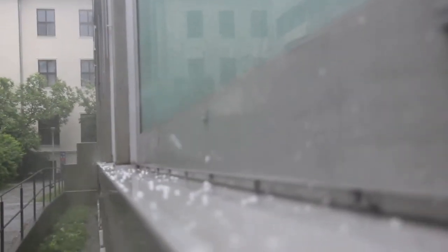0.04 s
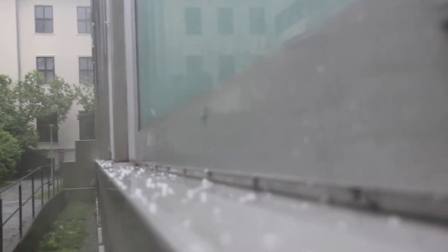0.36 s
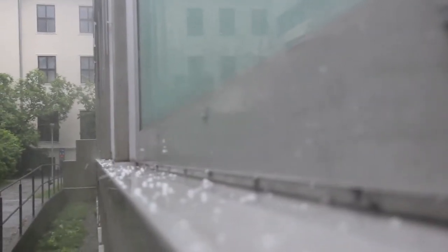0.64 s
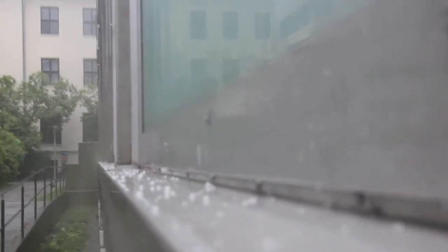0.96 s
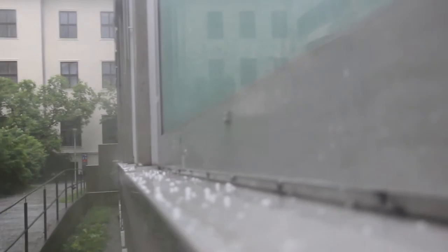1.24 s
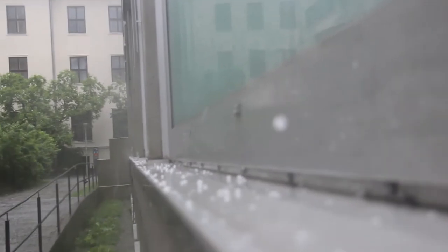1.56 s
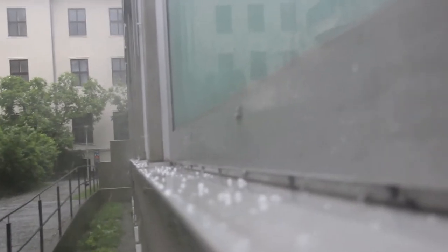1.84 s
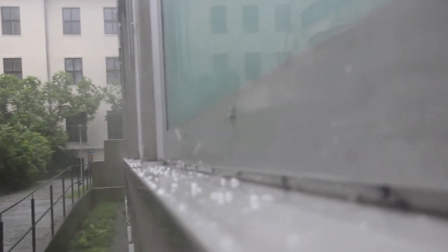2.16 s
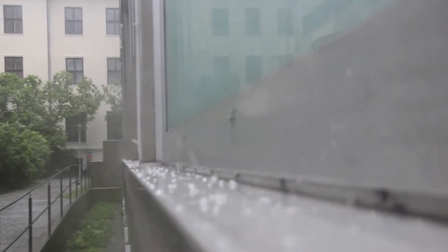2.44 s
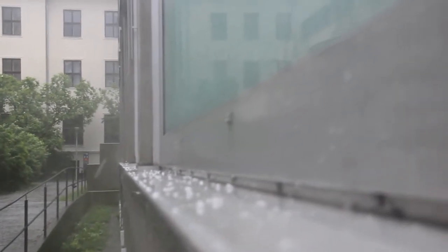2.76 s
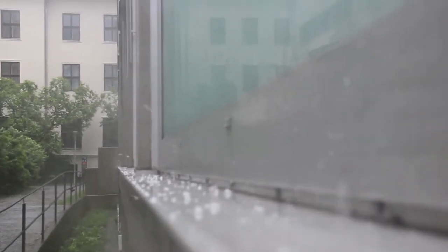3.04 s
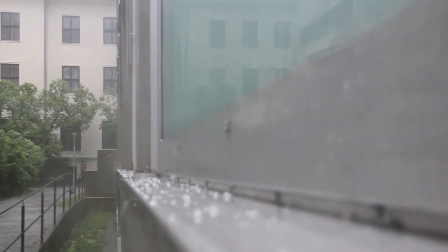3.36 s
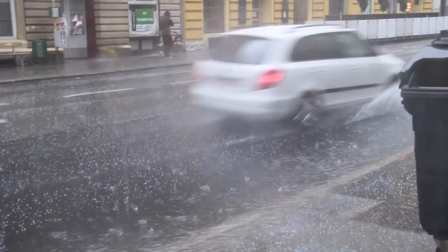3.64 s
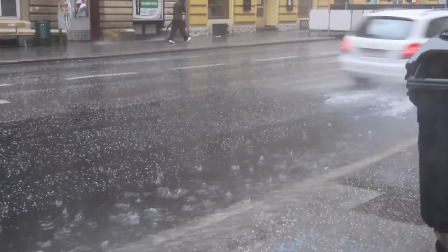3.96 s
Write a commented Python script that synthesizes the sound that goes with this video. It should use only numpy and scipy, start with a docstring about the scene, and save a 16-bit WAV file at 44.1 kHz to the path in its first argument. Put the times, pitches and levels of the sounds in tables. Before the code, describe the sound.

Hailstones crack and knock irregularly on a window ledge, ringing it briefly over steady rain and a faint low hum. The hits are loudest from 2 to 2.7 seconds, the rain dipping and swelling back after loud ones. Wind puffs at the microphone around 1 and 3.2 seconds, with a soft gust near 1.9. At 3.6 seconds it cuts to a street downpour with tyres hissing on wet road.

```python
"""A window ledge over a courtyard, in steady rain. Hailstones crack, knock and set the ledge ringing,
with short fizzes of spray and one overload snap; wind puffs at the microphone and one gust roars softly.
Each loud stone overloads the recorder and ducks its gain, so the rain dips and swells back.
Then the scene cuts to a street: a downpour and tyres hissing on the wet road.
A faint low hum lies under both places."""
import sys
import numpy as np
from scipy import signal
from scipy.io import wavfile
from scipy.ndimage import uniform_filter1d

SR = 44100
rng = np.random.default_rng(int(sys.argv[2]) if len(sys.argv) > 2 else 0)


def unload_wav(signal):
    """Save mono or channel-first audio to the path in sys.argv[1] as 16-bit WAV at rate SR, clipped to [-1, 1]."""
    wavfile.write(
        sys.argv[1],
        SR,
        np.round(np.clip(np.atleast_2d(signal).T, -1, 1) * 32767).astype(np.int16),
    )


N = 176400
TIME = np.arange(N) / SR
CUT_S, CUT_FADE_S = 3.564, 0.0056   # from the window to the street


def from_db(db):
    """Decibels to gain."""
    return 10 ** (np.asarray(db) / 20)


def rms_one(x):
    """Scale to rms 1."""
    return x / np.sqrt(np.mean(x ** 2) + 1e-20)


def fader(points):
    """A gain curve through (time_s, level_db) points."""
    return from_db(np.interp(TIME, *np.transpose(points)))


def swells(rows):
    """A gain curve of bell shapes, one per (peak_s, half_length_s, level_db) row."""
    return sum(from_db(db) * np.exp(-((TIME - peak_s) / half_s) ** 2) for peak_s, half_s, db in rows)


def band(x, edges_hz, kind="band"):
    """Gentle Butterworth filter."""
    sos = signal.butter(2, np.clip(edges_hz, 10, .45 * SR), kind, fs=SR, output="sos")
    return signal.sosfilt(sos, x)


def resonate(x, hz, q):
    """One resonance with gain 1 at its peak."""
    return signal.lfilter(*signal.iirpeak(min(hz, .45 * SR), max(q, 1), fs=SR), x + 1e-18)


def drift(rate_hz):
    """A smooth random wobble, rms 1."""
    hop, settle = 40, 2000
    pole = np.exp(-2 * np.pi * rate_hz * hop / SR)
    noise = rng.standard_normal(N // hop + settle + 2)
    slow = signal.lfilter([1], [1, -2 * pole, pole * pole], noise)[settle:]
    return np.interp(np.arange(N) / hop, np.arange(len(slow)), rms_one(slow))


def hiss(spectrum, flicker_db, flicker_hz):
    """Half-octave noise bands, each with its own level and flicker; rms 1."""
    edges = np.geomspace(24, 17400, 20)
    white = rng.standard_normal((2, N))
    hz, db = np.transpose(spectrum)
    out = np.zeros(N)
    for k, (low, high) in enumerate(zip(edges, edges[1:])):
        level_db = np.interp(np.log(low * high) / 2, np.log(hz), db)
        out += band(white[k % 2], (low, high)) * from_db(level_db + flicker_db * drift(flicker_hz))
    return rms_one(out)


def patter(per_s, low_hz, high_hz, q, spread_db, pitch_count=14):
    """Drops of random size, each ringing for a few cycles; rms 1."""
    sizes = from_db(spread_db * np.minimum(rng.exponential(1, N), 4)) * rng.choice([-1, 1], N)
    clicks = sizes * (rng.random(N) < per_s / SR)
    pitch_index = rng.integers(0, pitch_count, N)
    pitches = enumerate(np.geomspace(low_hz, high_hz, pitch_count))
    return rms_one(sum(resonate(clicks * (pitch_index == k), hz, q) / hz ** .5 for k, hz in pitches))


def hit(x, db):
    """Give a one-shot the energy of 5 ms at this level."""
    return from_db(db) * x * np.sqrt(.005 * SR / np.sum(x ** 2))


def burst(decay_s, size=4096):
    """Noise that starts at once and dies away."""
    return rng.standard_normal(size) * np.exp(-TIME[:size] / decay_s)


def add(out, start_s, sound):
    """Mix a sound in at a time."""
    i = int(np.clip(start_s * SR, 0, N - 1))
    out[i:i + len(sound)] += sound[:N - i]


# Tone of the far rain: freq_hz, density_db
RAIN_SPECTRUM = [(30, -16), (60, -14.5), (150, -9.5), (250, -8.5), (400, -4), (650, -2.5), (950, -1),
                 (1400, -.5), (2200, -1.5), (3500, -2), (5000, -6.5), (7500, -12), (10000, -19.5),
                 (12500, -25.5), (16000, -21)]
# Fader ride of the rain bed: time_s, level_db
RAIN_RIDE = [(0.0, -27), (0.2, -28), (0.4, -21.5), (0.65, -19), (0.85, -19.5), (1.0, -19), (1.25, -21),
             (1.55, -22.5), (1.85, -17.5), (2.1, -12.5), (2.3, -13), (2.5, -15), (2.75, -15), (3.0, -16),
             (3.2, -16.0), (3.35, -16.5), (3.55, -19)]


def courtyard_rain(trim_db=-0.25):
    """The bed: far hiss, nearer drops and small hail rise and fall together."""
    drops = from_db(-12) * patter(per_s=900, low_hz=910, high_hz=9300, q=2.4, spread_db=1.5)
    far_rain = hiss(RAIN_SPECTRUM, flicker_db=1.5, flicker_hz=23.4)
    return fader(RAIN_RIDE) * from_db(trim_db) * (far_rain + drops + pellets())


def pellets(per_s=12, tries=200):
    """Small stones and rebounds tick at random."""
    starts_s = rng.uniform(0, CUT_S, tries)
    levels_db = rng.normal(-8, 1.5, tries)   # relative to the rain
    pitches_hz = rng.uniform(5000, 9500, tries)
    landed = rng.random(tries) < per_s * CUT_S / tries
    out = np.zeros(N)
    for start_s, db, hz, lands in zip(starts_s, levels_db, pitches_hz, landed):
        add(out, start_s, lands * crack(hz, db, contact_s=0.00028))
    return out


def crack(hz, db, contact_s):
    """Brittle ice meets the ledge: a millisecond or two of crushing excites one high resonance."""
    crush = burst(contact_s)
    crush *= TIME[:len(crush)]   # builds up before it dies
    return hit(band(resonate(crush, hz, q=7.1), (4400, 11100)), db)


# Ringing modes of the ledge: pitch_hz, level_db, t60_s
LEDGE_MODES = [(845, -9, 0.04), (942, 1, 0.048), (1064, -4.5, 0.023), (1629, -6.5, .045), (1750, -9, .035),
               (2137, -2, 0.051), (3030, -12, 0.027)]


def ledge_ring(db):
    """The ledge rings briefly, differently for each place where it is struck."""
    t = TIME[:4096]
    ring = np.zeros(len(t))
    for k, (hz, level_db, t60_s) in enumerate(LEDGE_MODES):
        decay = from_db(level_db + rng.normal(0, 5.0) - 60 * t / t60_s)
        pitch_hz = hz * rng.normal(1, 0.023)
        ring += (-1) ** k * decay * np.sin(2 * np.pi * pitch_hz * t)
    return hit(ring, db)


# Hail hits on the ledge: start_s, crack_db, pitch_hz, knock_db, ring_db, contact_s
HAILSTONES = [(0.0174, -16.5, 8040, -21.5, -28, 0.00033), (0.105, -15.5, 5460, -19.5, -40, 0.00022),
              (0.1204, -24, 7050, -24, -28.5, 0.00058), (0.299, -25, 6900, -21.5, -46, 0.00028),
              (0.3748, -5, 6300, -27, -43, 0.00073), (0.5433, -22, 6000, -27, -35, 0.00061),
              (0.5514, -11, 7160, -11.5, -33, 0.00027), (0.6076, -9.5, 7700, -19, -25, 0.00037),
              (0.6665, -36, 5300, -13, -41, 0.00036), (0.7369, -7.5, 7400, -14.5, -37, 0.0002),
              (0.7595, -8.5, 8000, -21, -29, 0.00025), (0.7876, -16, 7000, -24, -28, 0.00051),
              (1.0013, -15.5, 7000, -16, -37, 0.00066), (1.0323, -25, 7340, -16, -19, 0.00036),
              (1.0385, -22, 6940, -15, -31, 0.00064), (1.0534, -11.5, 8300, -16.5, -18.5, 0.00033),
              (1.2174, -16, 7000, -18.5, -32, 0.00034), (1.2235, -15.5, 5900, -27, -25, 0.00037),
              (1.2848, -21, 5500, -18.5, -42, 0.00043), (1.313, -11.5, 7300, -19, -25, 0.00027),
              (1.4283, -20, 6640, -20, -37, 0.00043), (1.4867, -16, 6360, -16, -18, 0.00045),
              (1.4924, -19, 6700, -18, -20, 0.00062), (1.822, -15, 7200, -18, -35, 0.00053),
              (1.977, -4.5, 7000, -17, -35, 0.00034), (2.1257, -3, 7500, -3, -14.5, 0.0004),
              (2.1332, -4, 7000, -10, -24, 0.00063), (2.153, -0.5, 7600, -7, -21, 0.00029),
              (2.227, -32, 6100, -10, -25, 0.00047), (2.3497, -21, 7300, -17, -20, 0.00031),
              (2.3526, -10.5, 6500, -12.5, -27, 0.00031), (2.3862, -2, 7000, -9, -13.5, 0.00022),
              (2.4455, -2.5, 5270, -5.5, -9, 0.00031), (2.5112, -7, 6400, -14, -17, 0.00038),
              (2.58, -15, 7100, -15, -22, 0.00046), (2.603, -7, 6200, -3.5, -24, 0.00087),
              (2.6778, -7, 7450, -14.5, -20.5, 0.00029), (2.6883, -12, 7200, -13, -24.5, 0.00056),
              (2.861, -3, 7000, -17, -23, 0.00024), (2.8765, -8.5, 5450, -11.5, -31.5, 0.00069),
              (2.965, -6, 7900, -12, -25, 0.0003), (3.2131, -7.5, 7000, -12.5, -17, 0.00053),
              (3.2389, -6.5, 7700, -11.5, -19, 0.00051), (3.3481, -14, 6960, -14.5, -33, 0.00064),
              (3.3764, -9, 7400, -13, -21.5, 0.00047), (3.4753, -5, 7260, -13, -20, 0.00044),
              (3.5647, -7, 6360, -3.5, -18, 0.00055)]


def hail(crack_trim_db=-1.5, splash_trim_db=-1, ring_trim_db=4):
    """Each stone gives a crack, a knock, a splash of fragments and reflections, and a ledge ring."""
    out = np.zeros(N)
    for start_s, crack_db, pitch_hz, knock_db, ring_db, contact_s in HAILSTONES:
        knock = hit(band(burst(decay_s=0.0017), (1670, 5070)), knock_db)
        splash_db = 0.76 * knock_db + 0.24 * crack_db + splash_trim_db
        splash = hit(band(burst(decay_s=0.0087), (1260, 8300)), splash_db)
        snap = crack(pitch_hz, crack_db + crack_trim_db, contact_s)
        add(out, start_s, snap + knock + splash + ledge_ring(ring_db + ring_trim_db))
    return out


# Fader ride of the hum: time_s, level_db
HUM_RIDE = [(0, -72), (.4, -59), (.55, -52), (1.5, -47), (1.8, -44), (2.5, -47), (2.7, -59), (3.0, -60),
            (3.6, -47), (4.0, -53)]


def hum(pitch_hz=51.6):
    """A faint low sine that creeps in, sinks and returns."""
    return fader(HUM_RIDE) * np.sin(2 * np.pi * pitch_hz * TIME)


# Fizzes of spray and one overload snap: peak_s, half_length_s, level_db
FIZZES_AND_SNAP = [(.468, .014, -36), (.536, .005, -37), (.665, .005, -36), (.71, .008, -36),
                   (.95, .016, -33), (.999, .004, -31), (1.481, .004, -27), (1.657, .005, -33),
                   (1.7, .015, -38), (1.978, .0008, -12), (2.298, .005, -27), (2.873, .004, -27)]


def spray_and_snap():
    """Short bright fizzes of spray, and one sharp overload snap on the loud stone at 1.98 s."""
    fizz = patter(per_s=6500, low_hz=8000, high_hz=15000, q=3, spread_db=4.0)
    return swells(FIZZES_AND_SNAP) * rms_one(band(fizz, (7500, 15500)))


# Puffs on the microphone: peak_s, half_length_s, level_db
WIND_PUFFS = [(.92, .025, -31.5), (1.052, 0.042, -26.5), (1.167, 0.031, -24.5), (1.281, 0.027, -28.5),
              (1.406, 0.035, -33), (1.505, 0.023, -35), (1.79, 0.034, -36), (1.938, 0.023, -34),
              (2.057, 0.025, -31), (3.082, .022, -20.5), (3.133, .025, -26), (3.226, 0.034, -17),
              (3.295, 0.027, -20), (3.374, 0.02, -17.5), (3.423, 0.014, -25), (3.467, 0.027, -21.5)]
# Tone of the rumble before its low cut: freq_hz, density_db
WIND_SPECTRUM = [(25, 0), (50, -5), (100, -1), (220, -4), (330, -9.5), (600, -33), (2000, -60)]


def wind_puffs(low_cut_hz=48):
    """Wind buffets the microphone in soft puffs of rumble."""
    rumble = hiss(WIND_SPECTRUM, flicker_db=1.0, flicker_hz=9.4)
    return swells(WIND_PUFFS) * band(rumble, low_cut_hz, "high")


def gust(peak_s=1.89, half_length_s=0.2, level_db=-32.5):
    """One broad swell of wind roars softly in the courtyard."""
    roar = rms_one(band(rng.standard_normal(N), (340, 624)))
    return swells([(peak_s, half_length_s, level_db)]) * roar


# Tone of tyre spray and downpour: freq_hz, density_db
STREET_SPECTRUM = [(18, -46), (30, -19), (43, -17), (256, -8), (350, -3.5), (546, -7.5), (852, 2.5),
                   (921, 0), (1140, -4), (1440, -3.5), (2490, -2.5), (4190, -8), (6370, -9), (8720, -21.5),
                   (15500, -29.5)]
# Fader ride of the street bed: time_s, level_db
STREET_RIDE = [(3.57, -20), (3.6, -17.5), (3.65, -16.5), (3.74, -17.5), (3.81, -14.5), (3.85, -18),
               (3.96, -17), (4.0, -18)]
# Close drops on the pavement: start_s, level_db
CLOSE_SPLATS = [(3.65, -29), (3.7, -29), (3.887, -22), (3.89, -18.5)]


def street():
    """Tyre spray and downpour, a hollow tyre note, and drops splatting on the pavement."""
    splats = from_db(-12) * patter(per_s=450, low_hz=1200, high_hz=7000, q=5.7, spread_db=1.0)
    tyre_note = from_db(-17.5) * rms_one(resonate(rng.standard_normal(N), hz=358, q=8.5))
    wash = hiss(STREET_SPECTRUM, flicker_db=0.8, flicker_hz=13)
    out = fader(STREET_RIDE) * (wash + splats + tyre_note)
    for start_s, level_db in CLOSE_SPLATS:
        add(out, start_s, hit(band(burst(decay_s=.002), (2780, 7500)), level_db))
    return out


def at_window():
    """The crossfade: 1 at the window, 0 in the street."""
    return np.clip((CUT_S - TIME) / CUT_FADE_S + 1, 0, 1)


def scene():
    """The window, then the street; the same in both channels."""
    window = courtyard_rain() + hail() + spray_and_snap() + gust() + wind_puffs()
    mono = window * at_window() + street() * (1 - at_window())
    return np.array([mono, mono])


def ducking_db(x, threshold_db=-17, release_db_per_s=38.5, attack_s=0.023, detector_s=0.0077):
    """Gain control: peaks over the threshold pull the gain down; it climbs back at a steady rate."""
    size = int(detector_s * SR)
    power = uniform_filter1d(x ** 2, size, origin=(size - 1) // 2, mode="constant")
    over_db = np.maximum(10 * np.log10(np.maximum(power, 1e-12)) - threshold_db, 0)
    release_db = release_db_per_s * TIME
    held_db = np.maximum.accumulate(over_db + release_db) - release_db
    pole = np.exp(-1 / (attack_s * SR))
    return signal.lfilter([1 - pole], [1, -pole], held_db)


def record(dry):
    """The master chain: ducking at the window only, the hum, hard overload and a 16 kHz top cut."""
    ducked = dry * from_db(-ducking_db(dry[0]) * at_window())
    clipped = np.clip(ducked + hum(), -0.83, 0.83)
    top_cut = signal.ellip(10, .1, 70, 16000, fs=SR, output="sos")
    return signal.sosfilt(top_cut, clipped)


dry = scene()
out = record(dry)
unload_wav(out)
```